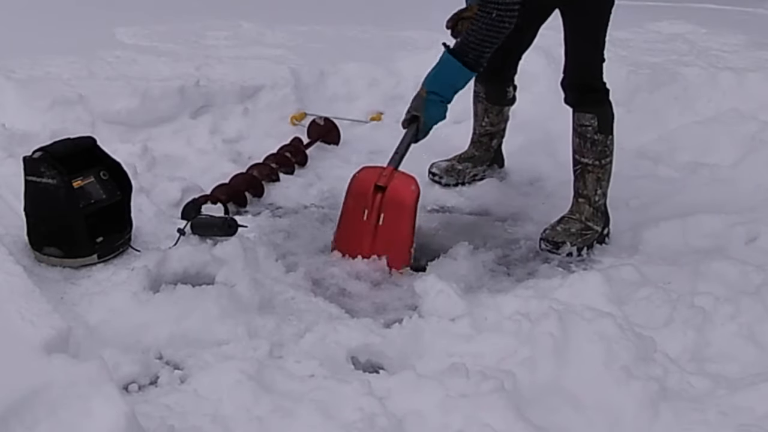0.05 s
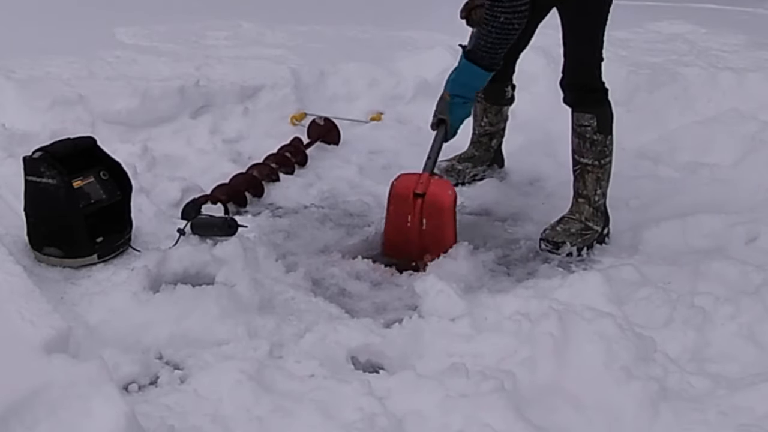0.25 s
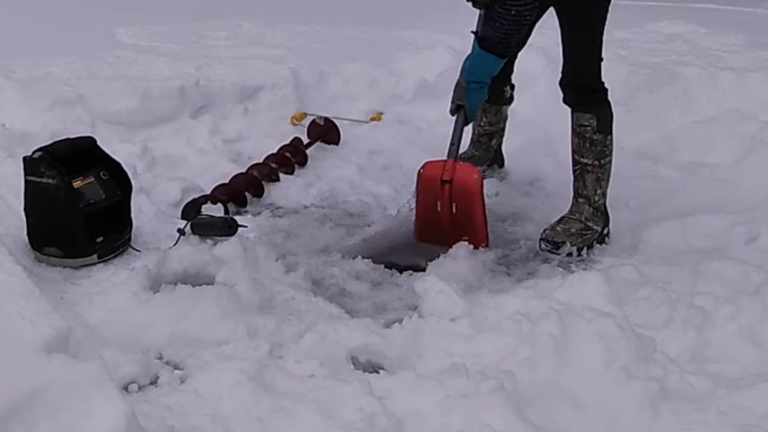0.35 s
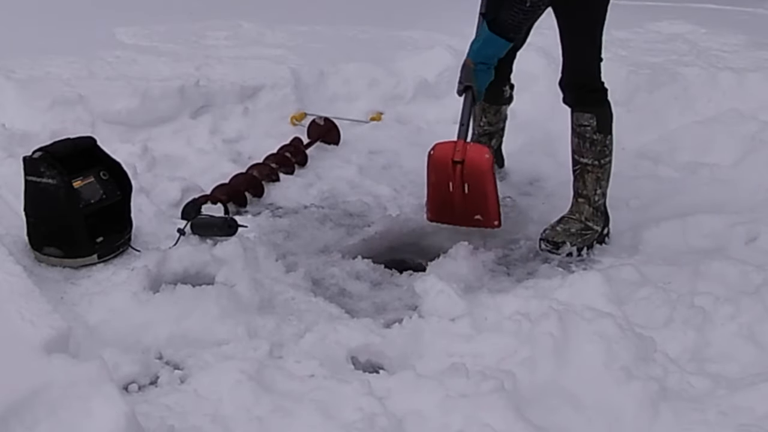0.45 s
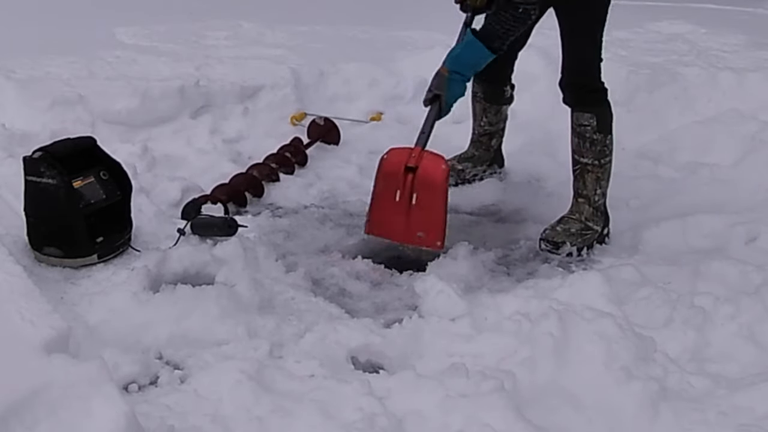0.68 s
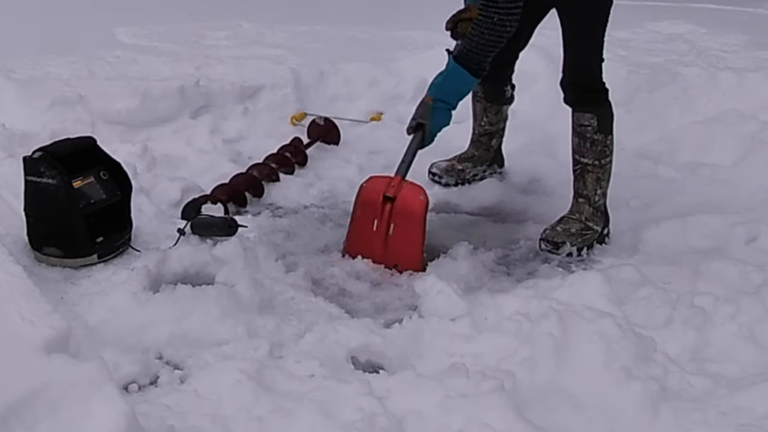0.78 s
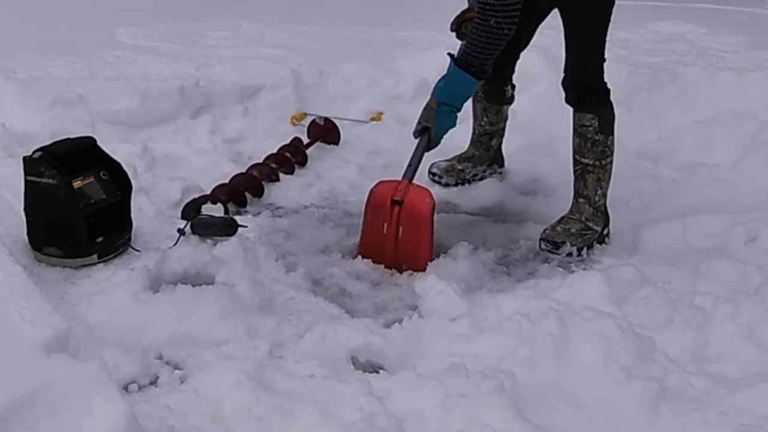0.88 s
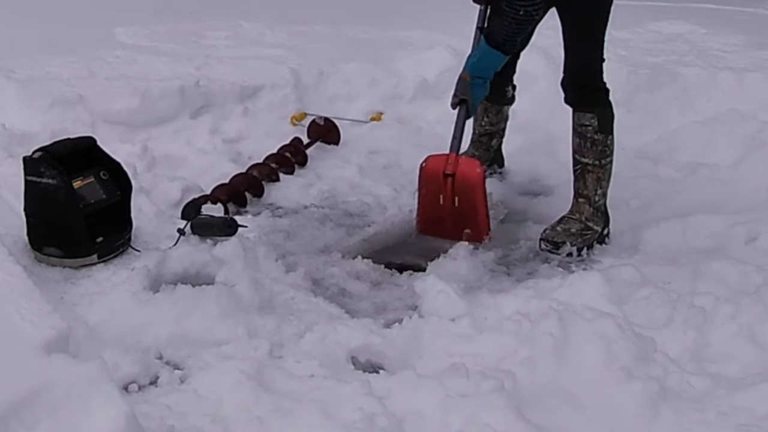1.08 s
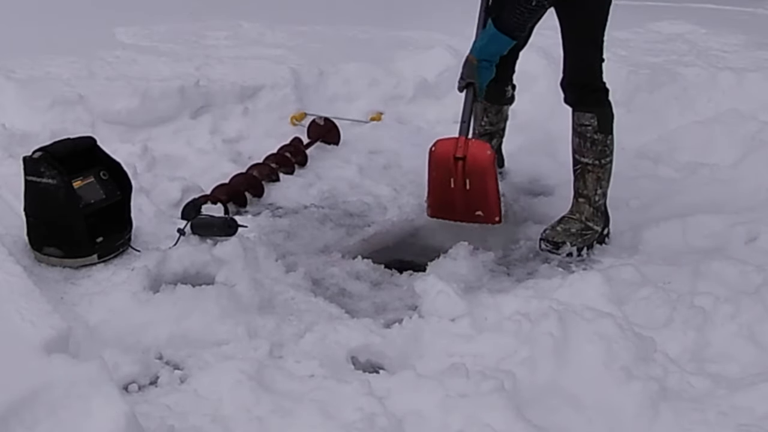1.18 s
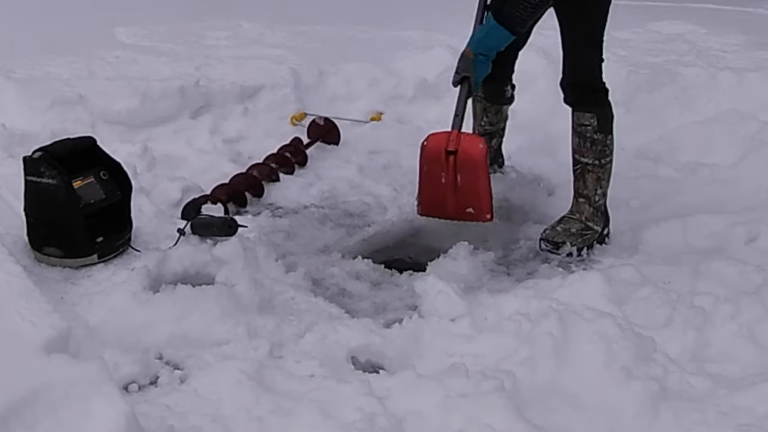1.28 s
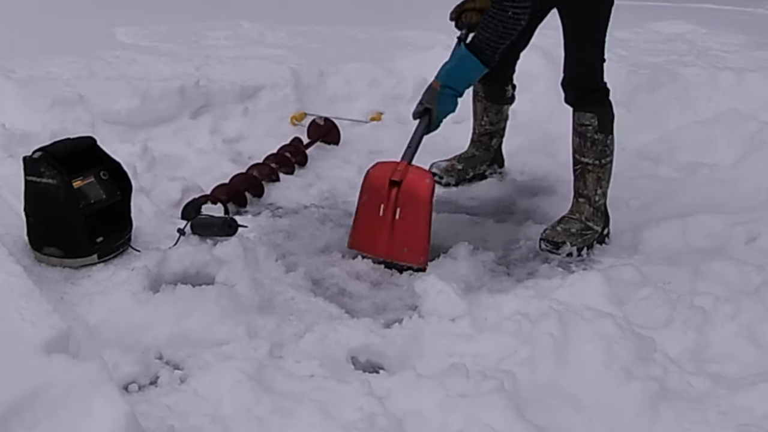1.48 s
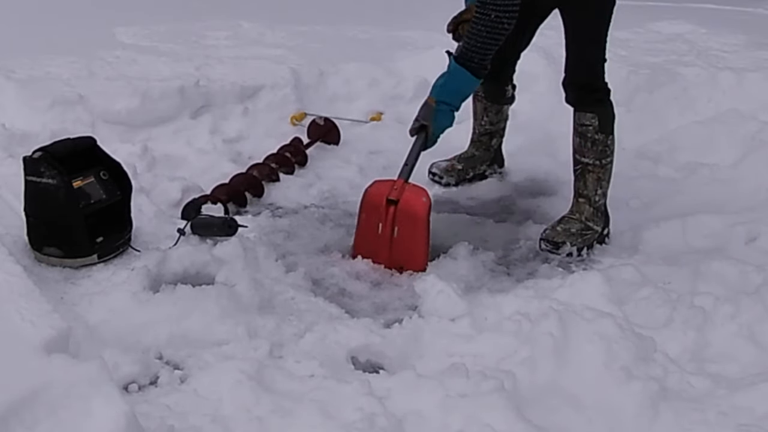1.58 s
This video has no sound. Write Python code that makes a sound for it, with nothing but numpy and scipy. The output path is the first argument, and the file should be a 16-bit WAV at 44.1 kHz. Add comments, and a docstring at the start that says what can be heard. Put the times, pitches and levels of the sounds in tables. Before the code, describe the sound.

A small shovel crunches into slushy snow close by, hitting the ice hardest at about 0.25 seconds, then scraping and knocking until 0.45. Loose crystals hiss and ice chips click, with a lighter crunch near 0.65. A second stroke knocks in at about 0.95 seconds and ends in another crunch and knock around 1.4. A faint breeze puffs on the microphone, and there is no echo.

```python
"""Loose snow crystals hiss, close to the microphone, under a faint puff of breeze: out in the open on
a frozen lake, a small shovel clears slushy snow in two strokes. The blade pushes crystals that slide
and settle, rasps on packed snow, crushes lumps of crust and knocks on the ice; single ice chips click.
There is no echo. The hardest knock overloads the microphone."""
import sys
import numpy as np
from scipy import signal
from scipy.fft import rfft, irfft, next_fast_len
from scipy.io import wavfile
from scipy.ndimage import map_coordinates

SR = 44100
rng = np.random.default_rng(int(sys.argv[2]) if len(sys.argv) > 2 else 0)


def wrap_up_sound(samples):
    """Save the sound to the file named by the first command line argument, as 16-bit audio."""
    columns = np.atleast_2d(samples).T
    # keep every value between -1 and 1, then stretch to whole-number steps
    tamed = np.clip(columns, -1, 1)
    steps = np.round(tamed * 32767).astype(np.int16)
    wavfile.write(sys.argv[1], SR, steps)


N = 72765
T = np.arange(N) / SR

# breeze puffing on the microphone: t/s, level/dB
BREEZE_LEVEL = [(0, -28), (.06, -51), (.84, -68), (.9, -40), (1.0, -47), (1.15, -48), (1.25, -42),
                (1.4, -66), (1.65, -56)]
# rumble of that air: f/Hz, level/dB
BREEZE_SPECTRUM = [(15, -3), (30, 17), (50, -11), (130, -27), (300, -21.5), (3000, -31), (15000, -55.5)]
# loose crystals sliding along the blade: t/s, level/dB
CRYSTAL_LEVEL = [(0, -36.5), (.065, -41.5), (.11, -47.5), (.139, -53), (.144, -37.5), (.19, -31.5),
                 (.222, -43), (.255, -17), (.295, -38), (.36, -30.5), (.45, -29.5), (.485, -36), (.55, -38),
                 (.635, -24), (.68, -32.5), (.725, -30.5), (.81, -33.5), (.9, -35.5), (.97, -27.5),
                 (1.01, -42), (1.06, -32), (1.125, -26), (1.17, -30), (1.225, -37.5), (1.29, -34.5),
                 (1.355, -26.5), (1.45, -32), (1.53, -30.5), (1.63, -35), (1.65, -42)]
# their hiss and crackle: f/Hz, level/dB
CRYSTAL_SPECTRUM = [(80, -57), (400, -28.5), (800, -10.5), (1500, -1.5), (2400, 2.5), (3200, -4),
                    (4300, -1.5), (6000, -10), (9500, -12.5), (15000, -25.5)]
# stereo side signal under the hiss: f/Hz, level/dB
SIDE_SPECTRUM = [(100, -85), (1000, -41), (8500, -47.5), (10500, -44), (12000, -14), (15000, -34)]
# packed snow in front of the blade: t/s, level/dB
PACKED_LEVEL = [(0, -56.5), (.135, -56.5), (.16, -45), (.225, -39), (.27, -46), (.3, -42), (.39, -28.5),
                (.46, -55), (.49, -38.5), (.58, -39), (.64, -35), (.69, -50.5), (.89, -55), (.95, -40),
                (1.02, -39.5), (1.07, -45.5), (1.115, -29.5), (1.2, -42), (1.28, -44.5), (1.375, -26.5),
                (1.44, -49.5), (1.65, -55.5)]
# its low rasp: f/Hz, level/dB
RASP_SPECTRUM = [(50, -34), (110, -20), (170, -2), (330, -9.5), (480, -5.5), (610, 3.5), (760, -3),
                 (1000, -7), (1350, -1), (2200, -6.5), (5000, -35)]
# single ice chips snapping: t/s, crack level/dB, ring level/dB, ring f/Hz
CHIP_SNAPS = [(0.0663, -25, -42, 5230), (.143, -22.5, -26, 2340), (.212, -36, -29, 2000),
              (0.2496, -16.5, -20, 4000), (0.5407, -15, -22, 4190), (.672, -27, -33, 4540),
              (.7098, -47, -17.5, 4130), (0.7886, -24, -35, 4200), (1.098, -14, -25, 4510),
              (1.138, -27, -31, 2680), (1.25, -21.5, -26, 4570), (1.3625, -19.5, -25, 4220),
              (1.536, -34, -26, 6570)]
# a chip's crack: f/Hz, level/dB
CRACK_SPECTRUM = [(80, -64), (500, -57), (1300, -21), (2500, -2), (4400, 9), (6000, 1), (9000, 1),
                  (11000, 3), (15000, -21)]
# lumps of crust giving way: peak t/s, level/dB, rise/s, t60/s, centre f/Hz
CRUST_LUMPS = [(0.2417, -11, 0.00034, 0.02, 1490), (.252, -12.5, 0.0026, .11, 1840),
               (0.278, -21.5, .005, 0.016, 2180), (0.307, -23.5, 0.0042, 0.049, 1800),
               (0.3229, -19, 0.0011, 0.053, 1090), (.354, -18.5, 0.0034, 0.046, 1450),
               (.383, -20.5, 0.0029, 0.011, 2850), (0.395, -25.5, 0.0021, 0.024, 2020),
               (.4045, -11.5, 0.0033, 0.0073, 1510), (0.439, -25.5, 0.0086, 0.15, 1590),
               (.6, -26, 0.012, 0.068, 1500), (0.64, -21, 0.011, 0.15, 1190),
               (0.701, -55, 0.002, 0.026, 930), (.723, -27, 0.0025, 0.066, 1700),
               (.936, -18.5, 0.0041, 0.05, 1460), (0.9499, -13.5, 0.00067, 0.066, 980),
               (0.97, -20.5, 0.012, 0.017, 1340), (1.089, -37, 0.0006, 0.023, 900),
               (1.105, -12, 0.0081, 0.0099, 2220), (1.134, -27, 0.007, 0.059, 2170),
               (1.246, -32, 0.015, 0.058, 970), (1.301, -31, 0.0034, 0.036, 1500),
               (1.3269, -14.5, 0.0014, 0.021, 1780), (1.346, -17.5, 0.0056, 0.1, 1700),
               (1.3627, -9.5, 0.00048, 0.0085, 1920), (1.369, -20, 0.0017, 0.069, 2340),
               (1.39, -23, 0.0035, 0.089, 1190), (1.4071, -20, 0.0018, 0.05, 1300)]
# breaking crust: f/Hz, level/dB
CRUST_SPECTRUM = [(40, -46), (100, -6.5), (180, 0), (550, 8.5), (880, 3), (1100, 4), (1900, 1.5),
                  (2700, 3.5), (3300, -1.5), (5000, -1.5), (9500, -8.5), (15000, -18)]
# the blade meets hard ice; its main mode shifts with how it is held:
# t/s, level/dB, main mode f/Hz, t60/s, thud level/dB re main mode
BLADE_KNOCKS = [(.2513, 4, 620, 0.056, -10.5), (0.279, -8, 581, 0.043, -13.5),
                (0.3212, -4, 554, 0.013, -15), (0.3509, -4.5, 514, 0.027, -9),
                (0.368, -23.5, 501, 0.073, 3), (0.404, -8.5, 439, 0.036, -7.5),
                (0.435, -10, 514, 0.015, -10), (0.544, -29, 537, 0.064, -14), (.626, -16, 525, 0.045, -32),
                (0.637, -18.5, 1080, 0.071, -36), (.646, -9, 690, 0.022, -28),
                (.793, -26.5, 620, 0.024, -44), (0.932, -18, 637, 0.069, -9), (0.9472, 0, 528, 0.015, -11),
                (0.9667, -2, 588, 0.041, -8), (1.09, -19.5, 523, 0.051, -4.5), (1.103, -23, 475, 0.063, 3),
                (1.3779, -3, 805, 0.021, -26), (1.379, 0, 1100, 0.025, -41)]
# overtones of the blade: f/Hz, level/dB re main mode, t60/s
BLADE_MODES = [(1020, -16.5, 0.031), (1113, -14, 0.068), (1306, -9.5, 0.017), (1844, -19, 0.085),
               (1892, -20.5, 0.038), (2520, -27, 0.053), (2640, -45, .07), (4860, -32, 0.11)]
# shaft and ice under the blow: f/Hz, level/dB re thud level, t60/s
THUD_MODES = [(165.4, -5.5, 0.052), (228, -3, 0.032), (310, 1.5, .025), (407.4, 7, 0.013)]
# the freed blade ringing on faintly: f/Hz, level/dB re main mode, t60/s
FREE_BLADE_MODES = [(321, -42.5, 0.37), (604, -39, 0.14)]
# microphone response: f/Hz, level/dB
MIC_RESPONSE = [(25, -10), (95, -2), (150, -1.5), (7100, -0.5), (7500, -10.5), (8150, 3.5), (9950, 2.5),
                (10800, -8.5), (14500, -8), (15700, -41)]


def amp(db):
    """Decibels to gain."""
    return 10 ** (np.asarray(db) / 20)


def unit(x):
    """Scaled to rms 1."""
    return x / np.sqrt(np.mean(x ** 2) + 1e-20)


def curve(points):
    """(f/Hz, level/dB) points as a function of frequency, joined on a log axis."""
    freqs, db = np.transpose(points)
    return lambda hz: np.interp(np.log(hz + 1), np.log(freqs + 1), db)


def level(points):
    """(t/s, level/dB) points as a gain for every sample."""
    return amp(np.interp(T, *np.transpose(points)))


def coloured(x, db_at):
    """x through a causal filter whose gain in dB is db_at(Hz)."""
    size = 2 * next_fast_len(len(x))
    cepstrum = irfft(np.log(amp(db_at(np.fft.rfftfreq(size, 1 / SR)))), size)
    cepstrum[1:size // 2] *= 2  # fold to minimum phase
    cepstrum[size // 2 + 1:] = 0
    return irfft(rfft(x, size) * np.exp(rfft(cepstrum)), size)[:len(x)]


def fade(t, t60):
    """Exponential decay by 60 dB in t60."""
    return np.exp(-np.log(1000) * t / t60)


def add(track, start_s, sound):
    """Mix a sound into the track from start_s."""
    part = track[max(0, round(start_s * SR)):][:len(sound)]
    part += sound[:len(part)]


def breeze():
    """Moving air rumbles faintly on the microphone."""
    return level(BREEZE_LEVEL) * unit(coloured(rng.standard_normal(N), curve(BREEZE_SPECTRUM)))


def fractures(size, per_s, spread_db):
    """Random tiny breaks of unequal strength, rms 1."""
    hits = rng.random(size) < per_s / SR
    polarity = np.sign(rng.standard_normal(size))
    strength = amp(spread_db * np.clip(rng.standard_normal(size), -2, 2))
    return unit(hits * polarity * strength)


def ringing_grains(count, centre_hz, spread_oct, t60_cycles, spread_db):
    """Scattered ice grains that each ring for a few cycles, rms 1."""
    samples = np.arange(SR // 50)
    start = rng.integers(0, N, count)[:, None]
    pitch, size = np.clip(rng.standard_normal((2, count, 1)), -2, 2)
    cycles = centre_hz * 2 ** (spread_oct * pitch) * samples / SR
    envelope = fade(cycles, t60_cycles) * (1 - np.exp(-cycles))
    grains = amp(spread_db * size) * np.sin(2 * np.pi * cycles) * envelope
    return unit(np.bincount((start + samples).ravel(), grains.ravel(), N)[:N])


def clumps(per_s=110, spread_db=1.6):
    """A quick random gain: snow moves in small clumps."""
    knots = np.clip(rng.standard_normal(int(T[-1] * per_s) + 10), -2, 2)
    return unit(amp(spread_db * map_coordinates(knots, [T * per_s])))


def blade_ring(drive):
    """The blade's overtones, set ringing by the snow against it."""
    t = np.arange(SR // 12) / SR
    response = sum(amp(db) * np.cos(2 * np.pi * hz * t) * fade(t, t60) for hz, db, t60 in BLADE_MODES)
    return signal.fftconvolve(drive, response / np.linalg.norm(response))[:len(drive)]


def packed_snow():
    """Packed snow rasps on the blade and rings it; wet slush plips."""
    scrape = fractures(N, per_s=1300, spread_db=7.5)
    rasp = unit(coloured(scrape, curve(RASP_SPECTRUM))) + amp(-18) * blade_ring(scrape)
    slush = ringing_grains(count=260, centre_hz=1290, spread_oct=.4, t60_cycles=16, spread_db=0)
    return level(PACKED_LEVEL) * (clumps() * unit(rasp) + amp(-9.5) * slush)


def loose_crystals():
    """Loose crystals hiss, tinkle and crackle as they slide along the blade."""
    hiss = unit(coloured(fractures(N, per_s=7000, spread_db=4.5), curve(CRYSTAL_SPECTRUM)))
    tinkle = ringing_grains(count=1600, centre_hz=2924, spread_oct=.6, t60_cycles=15.5, spread_db=10)
    crackle = unit(coloured(fractures(N, per_s=240, spread_db=1), curve(CRYSTAL_SPECTRUM)))
    return level(CRYSTAL_LEVEL) * unit(clumps() * hiss + amp(-7) * tinkle + amp(-15.5) * crackle)


def ice_chips(overtone_ratio=2.25):
    """Each chip snaps with a sharp crack and a short glassy ring."""
    track, t = np.zeros(N), np.arange(SR // 20) / SR
    for start_s, crack_db, ring_db, hz in CHIP_SNAPS:
        burst = fade(t, t60=.009) * np.sign(rng.standard_normal(len(t)))
        crack = coloured(burst, curve(CRACK_SPECTRUM))
        ring = np.sin(2 * np.pi * hz * t) + .5 * np.sin(2 * np.pi * hz * overtone_ratio * t)
        ring *= fade(t, t60=.022) * (1 - np.exp(-hz * t))
        add(track, start_s, amp(crack_db) * crack + amp(ring_db) * ring)
    return track


def crust_crunches(width_oct=.84, skirt_db=-11, lead_s=.04):
    """Each lump breaks in a burst of fractures that swells, dies and rings the blade."""
    track = np.zeros(N)
    t = np.arange(SR // 6) / SR - lead_s  # zero at the peak
    for peak_s, db, rise_s, t60, centre_hz in CRUST_LUMPS:
        def lump_db(hz):
            """The crust spectrum with a hump at this lump's centre frequency."""
            octaves = np.log2((hz + 1) / centre_hz)
            hump = amp(skirt_db) + np.exp(-(octaves / width_oct) ** 2 / 2)
            return curve(CRUST_SPECTRUM)(hz) + 20 * np.log10(hump)

        burst = unit(coloured(fractures(len(t), per_s=5500, spread_db=3.5), lump_db))
        envelope = np.exp(np.minimum(t, 0) / rise_s) * fade(np.maximum(t, 0), t60)
        add(track, peak_s - lead_s, amp(db) * envelope * burst)
    return track + amp(-24) * blade_ring(track)


def struck_modes(t, modes, scatter_db=1.5, detune=.008):
    """Decaying modes of alternating sign; level and pitch vary a little from blow to blow."""
    sound = np.zeros(len(t))
    for k, (hz, db, t60) in enumerate(modes):
        gain = (-1) ** k * amp(db + rng.normal(0, scatter_db))
        detuned_hz = hz * (1 + rng.normal(0, detune))
        sound += gain * np.sin(2 * np.pi * detuned_hz * t) * fade(t, t60)
    return sound


def blade_knocks(attack_s=.0011):
    """The blade strikes the ice and rings briefly, damped by snow, over a dull thud."""
    track, t = np.zeros(N), np.arange(SR // 6) / SR
    attack = 1 - np.exp(-t / attack_s)
    for start_s, db, main_hz, t60, thud_db in BLADE_KNOCKS:
        main_mode = np.sin(2 * np.pi * main_hz * t) * fade(t, t60)
        overtones = struck_modes(t, BLADE_MODES) * fade(t, 4 * t60)
        thud = amp(thud_db) * struck_modes(t, THUD_MODES)
        after_ring = struck_modes(t, FREE_BLADE_MODES)
        add(track, start_s, amp(db) * attack * (main_mode + overtones + thud + after_ring))
    return track


def scene():
    """The shovel close up and dead centre; only the finest hiss spreads left and right."""
    mid = breeze() + packed_snow() + loose_crystals() + ice_chips() + crust_crunches() + blade_knocks()
    side = level(CRYSTAL_LEVEL) * coloured(rng.standard_normal(N), curve(SIDE_SPECTRUM))
    return np.array([mid + side, mid - side])


def record(dry):
    """The microphone notches the treble, flattens the biggest peaks and ends at its band limit."""
    picked_up = np.array([coloured(channel, curve(MIC_RESPONSE)) for channel in dry])
    clipped = picked_up / (1 + np.abs(picked_up) ** 8) ** (1 / 8)  # soft overload at full scale
    size = next_fast_len(N + SR // 10)
    passband = np.fft.rfftfreq(size, 1 / SR) < 15700
    return irfft(rfft(clipped, size) * passband, size)[:, :N]


dry = scene()
out = record(dry)
wrap_up_sound(out)
```